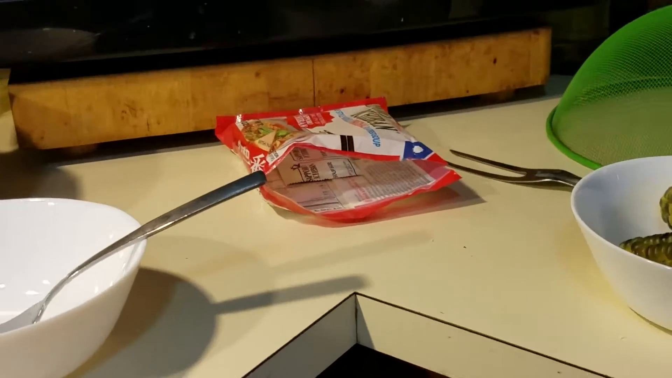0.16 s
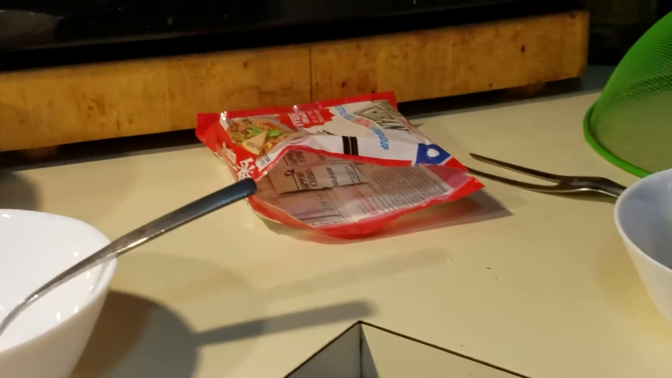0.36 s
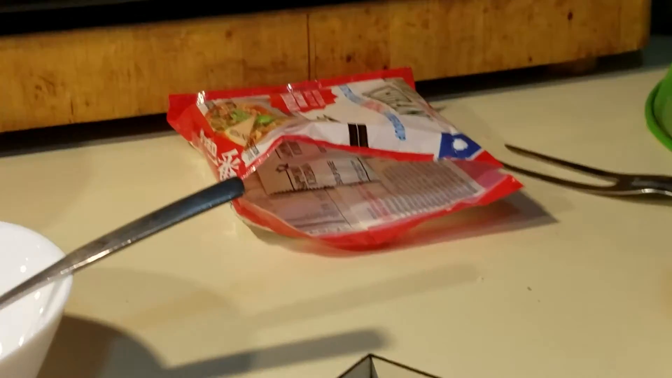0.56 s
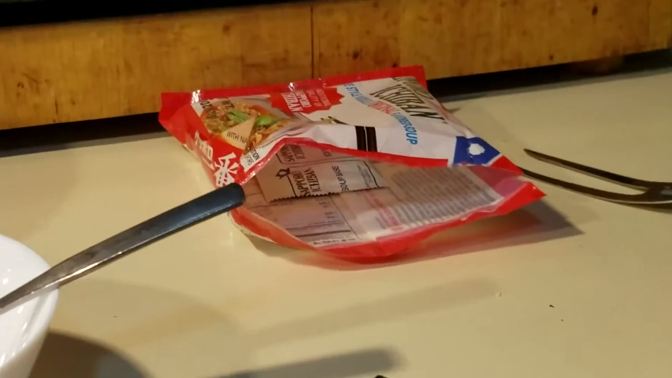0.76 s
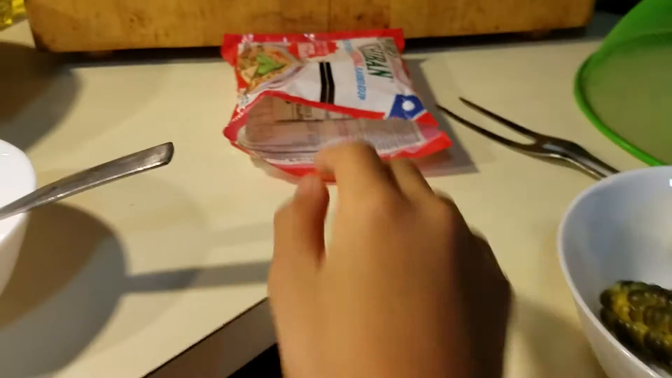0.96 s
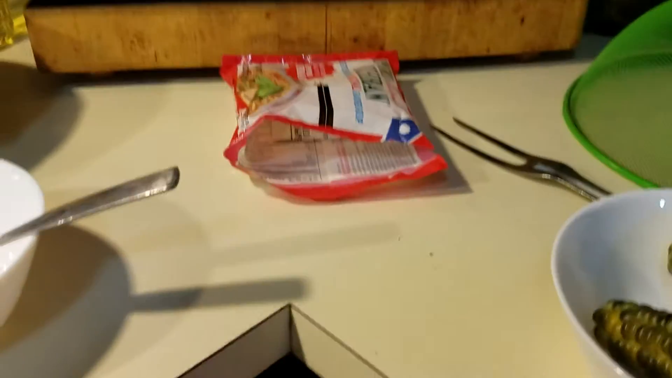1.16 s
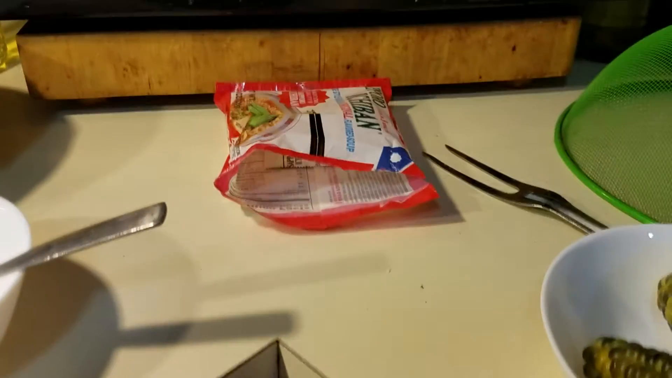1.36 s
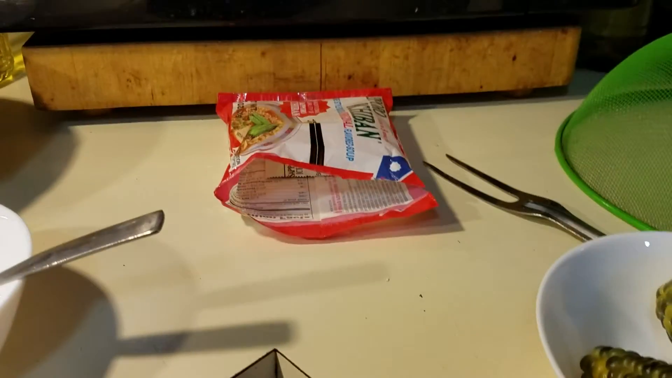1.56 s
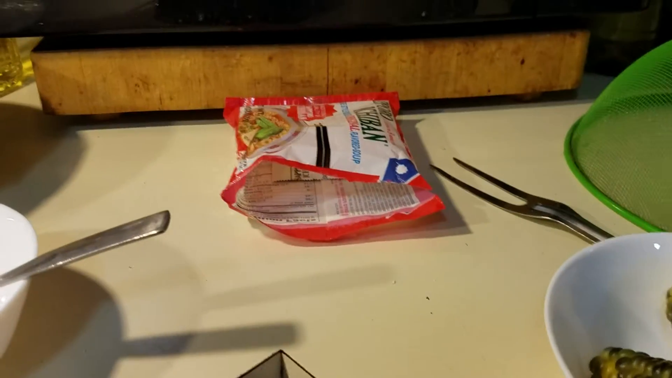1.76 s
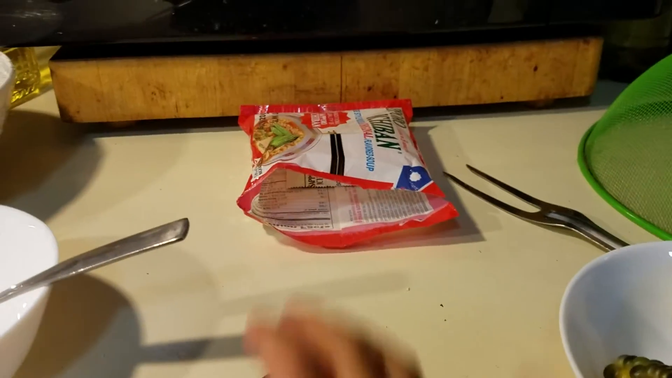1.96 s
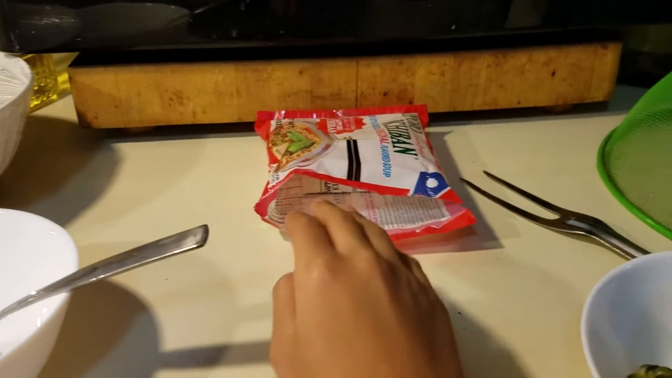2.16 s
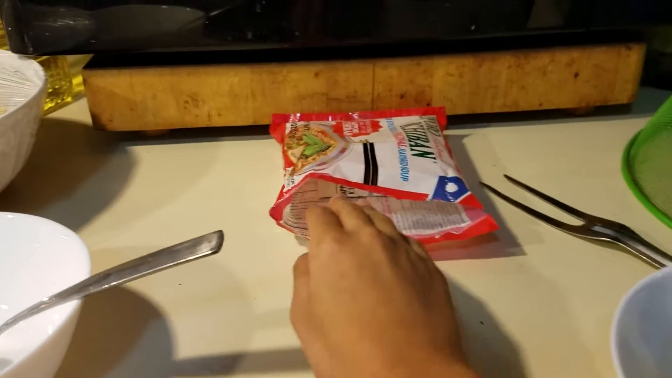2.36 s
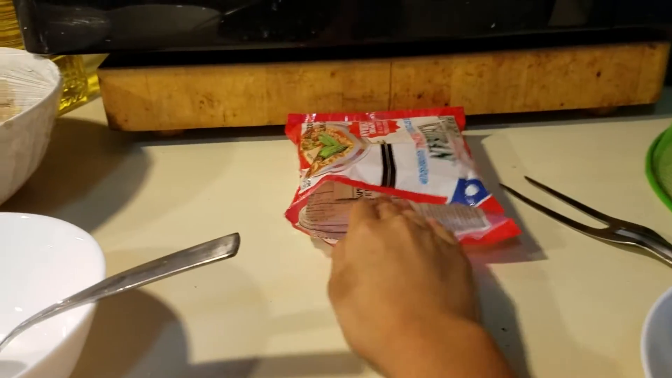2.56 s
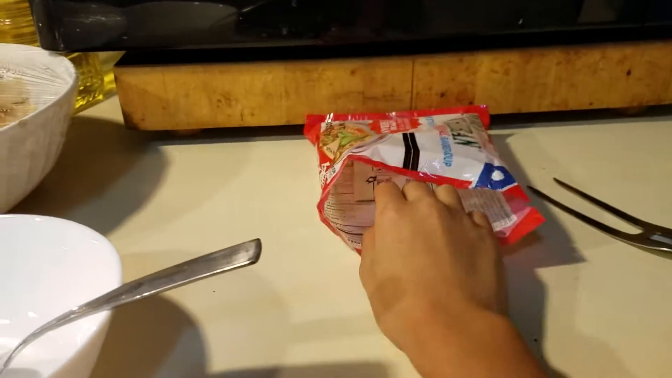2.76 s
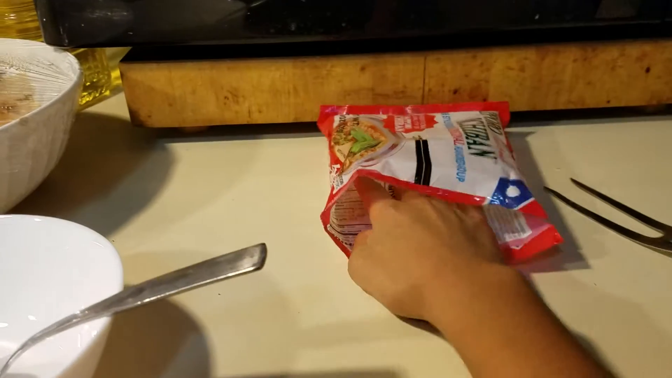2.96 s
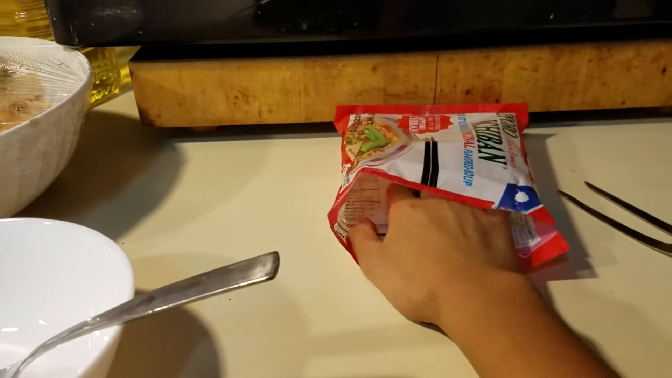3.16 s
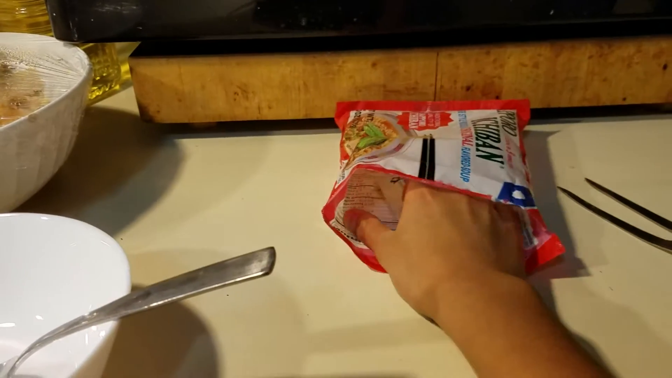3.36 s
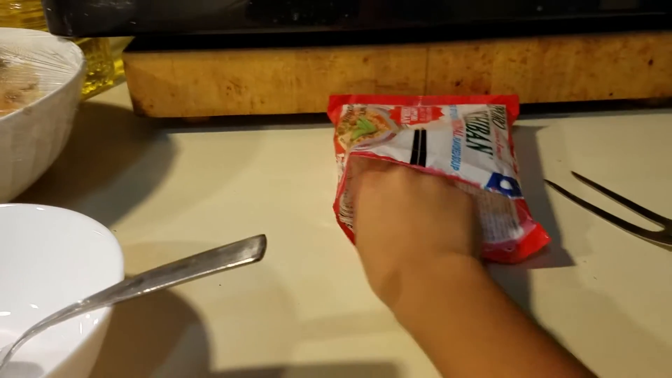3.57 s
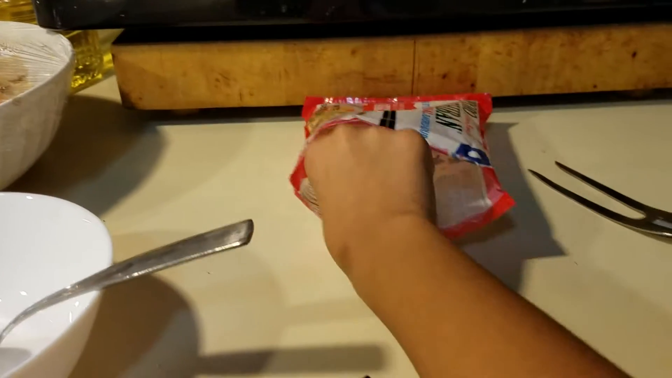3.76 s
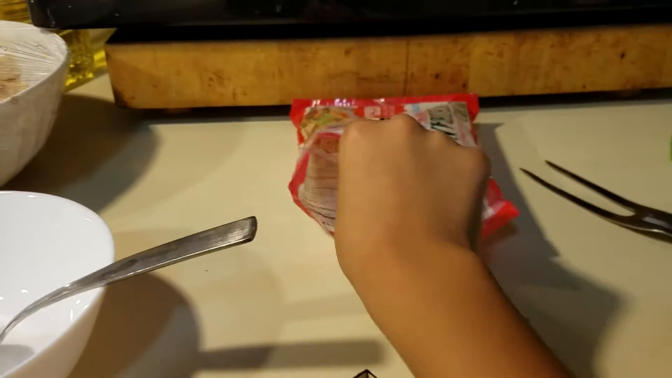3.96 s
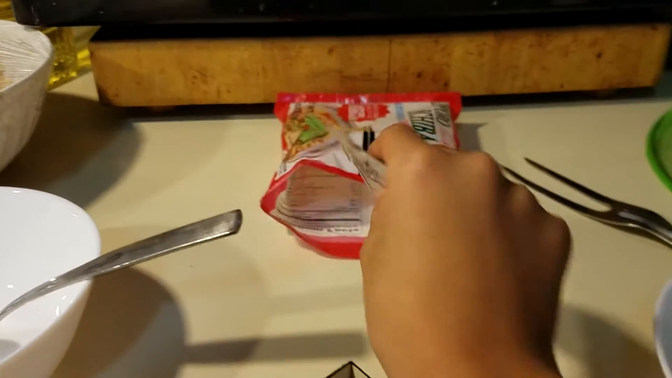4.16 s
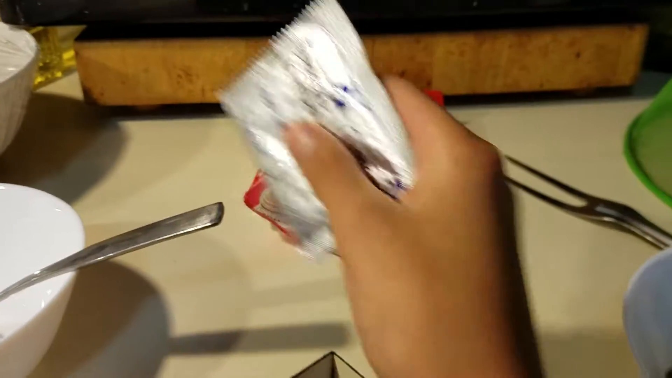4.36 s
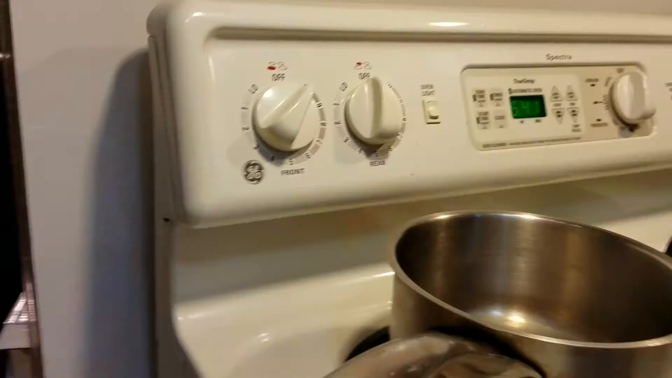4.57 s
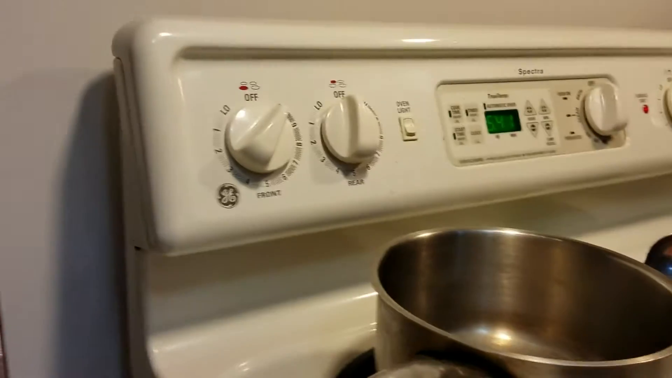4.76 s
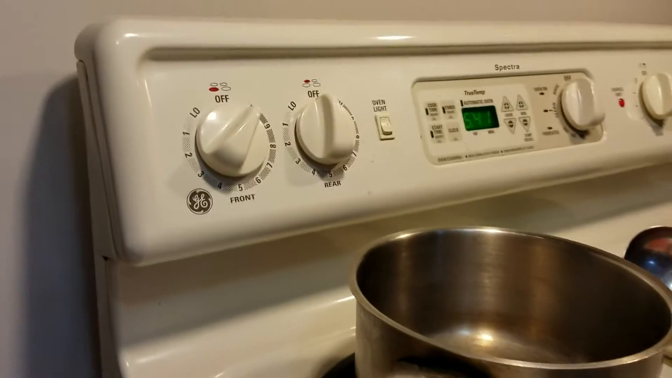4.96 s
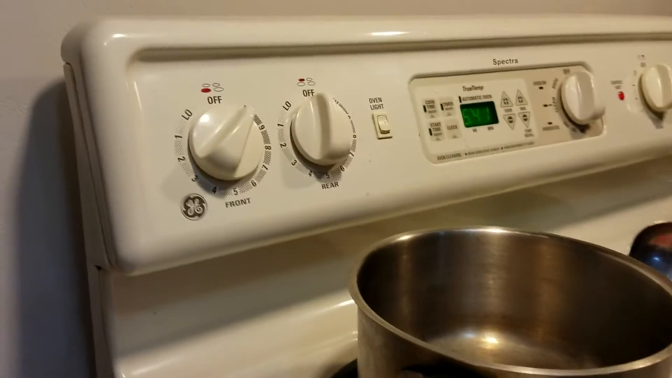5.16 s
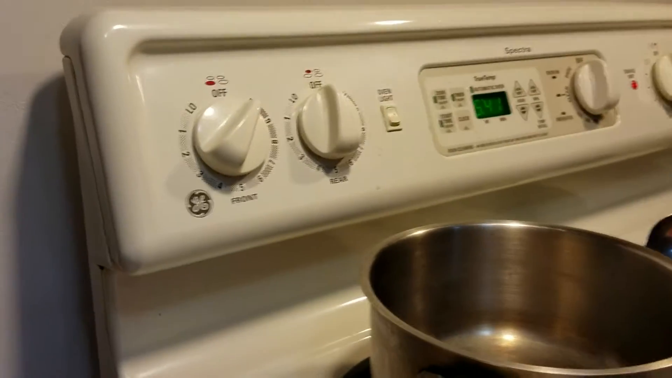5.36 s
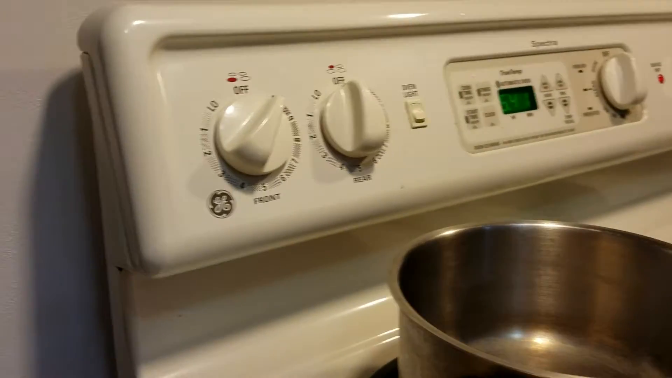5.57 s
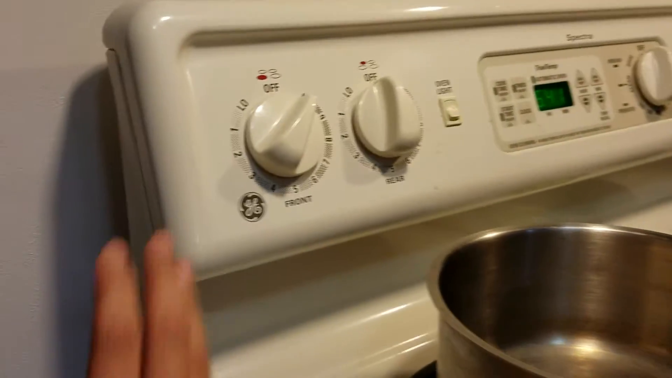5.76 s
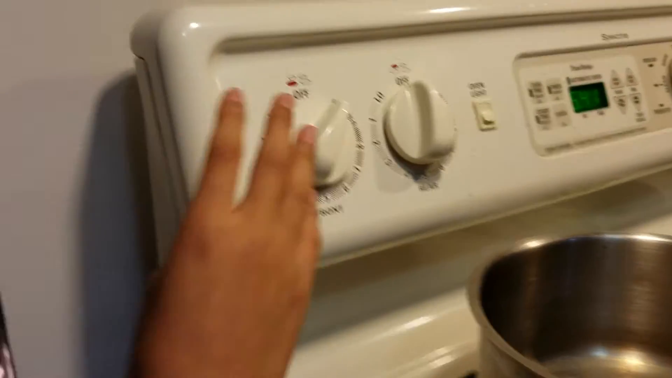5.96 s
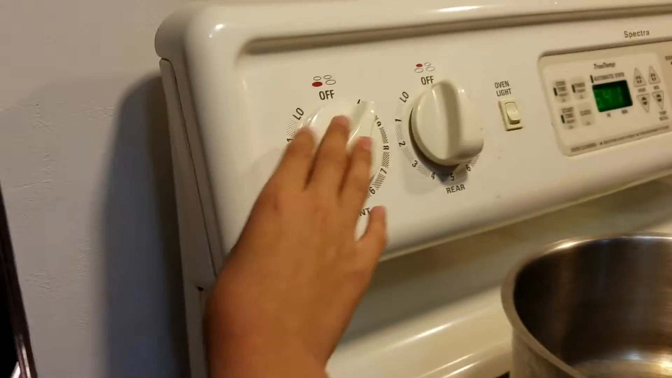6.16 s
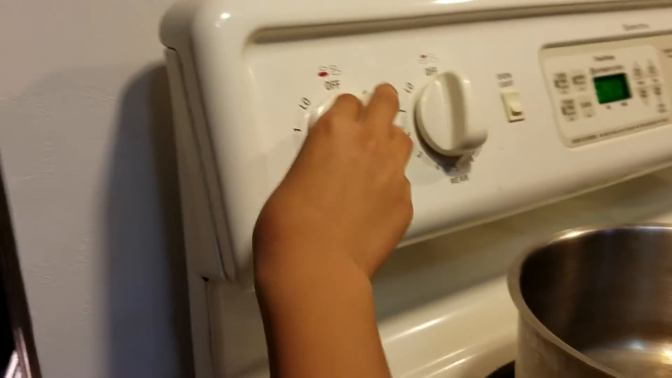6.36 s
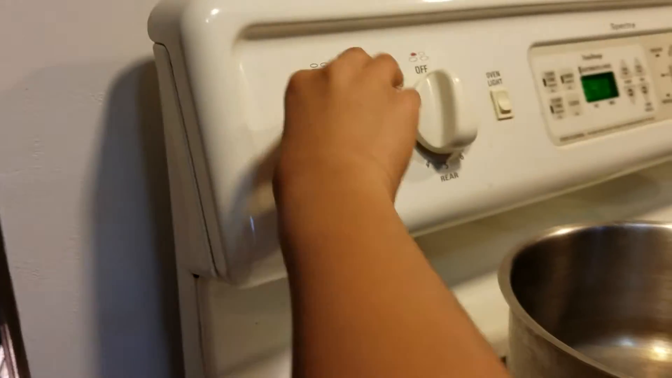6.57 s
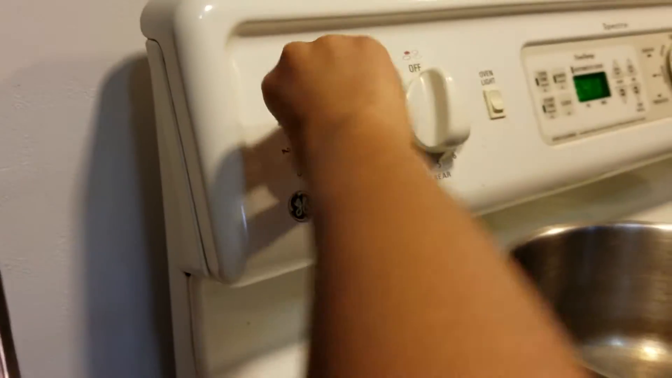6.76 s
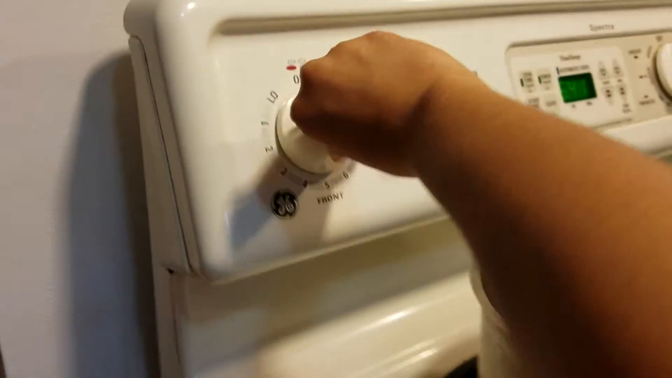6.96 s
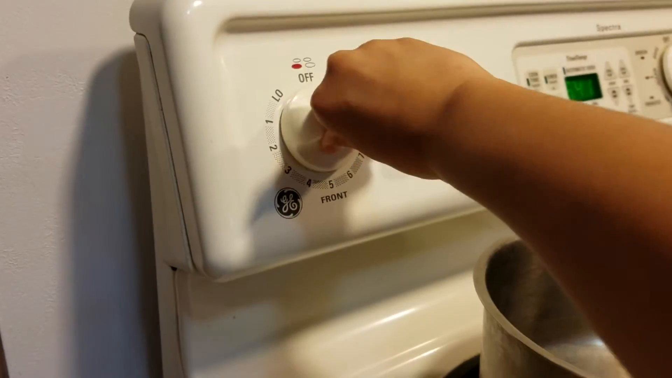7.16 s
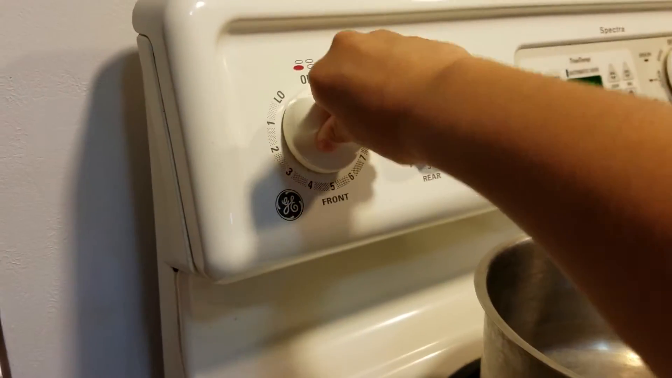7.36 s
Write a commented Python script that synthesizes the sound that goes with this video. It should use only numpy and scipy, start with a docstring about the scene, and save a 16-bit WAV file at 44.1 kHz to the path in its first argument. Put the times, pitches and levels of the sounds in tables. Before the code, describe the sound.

Close to a stereo microphone, after a moment of low kitchen room tone, a plastic wrapper rustles and crackles in uneven squeezes, with the crunch and small hollow knocks of dry noodles inside. A sachet swishes out softly. Then a faint, steady hiss starts slightly to the right, fingers tap and bump, a dry tick sounds, and a stove knob clicks round, briefly ringing its metal panel.

```python
"""Noodle packet and stove knob

A small kitchen, a stereo phone close to the worktop. A hand squeezes an opened packet of dry instant
noodles: creases in the plastic snap over a rustle of tiny buckles and crumbs, the block knocks on the
worktop, and the soup sachet slides out. A faint background hiss sets in on the right. Then the hand
takes hold of a stove knob and turns it with a click that rings its steel panel."""
import sys
import numpy as np
from scipy import signal
from scipy.fft import rfft, irfft, next_fast_len
from scipy.io import wavfile
from scipy.ndimage import uniform_filter1d

SR = 44100
rng = np.random.default_rng(int(sys.argv[2]) if len(sys.argv) > 2 else 0)


def put_to_file(sound):
    """Save the sound as 16-bit audio at rate SR, in the file named by the first command-line argument."""
    columns = np.atleast_2d(sound).T  # one column per channel
    safe = np.clip(columns, -1, 1)
    whole_steps = np.round(safe * 32767)
    wavfile.write(sys.argv[1], SR, whole_steps.astype(np.int16))


N = 326945
TIME = np.arange(N) / SR
TOP_HZ = 15900  # the phone's upper limit
HAND_IN_S, HAND_OUT_S = 2.42, 4.094  # the hand is in the packet

# Snaps of the packet, levels over the first 10 ms, the facet against its own band:
# start_s, noodle_crack_db, film_db, fizz_db, decay_s, ring_hz, facet_db
CREASE_SNAPS = [(2.429, -52.5, -51.5, -74, .004, 3550, 6), (2.4694, -45.5, -54, -57, 0.011, 1290, 3),
                (2.4807, -44, -47.5, -68, 0.013, 1400, -12), (2.5841, -44.5, -36.5, -41.5, 0.0042, 5750, 3),
                (2.658, -59, -50.5, -61, 0.0051, 6300, 3), (2.714, -48.5, -51, -60, 0.0095, 3570, -2),
                (2.7328, -61, -45, -54, 0.0048, 3400, 3), (2.7371, -43.5, -34, -38, 0.0045, 2900, -2),
                (2.7635, -48, -47, -42.5, 0.0093, 8630, 0), (2.8137, -47, -50, -50, 0.0048, 8890, 0),
                (2.866, -50, -48, -36, 0.0084, 4250, -6), (2.869, -47, -38.5, -49, 0.0068, 3420, -13),
                (2.891, -41.5, -42.5, -40, .006, 1380, 4), (2.9343, -49, -50, -45, 0.0066, 12530, 0),
                (2.972, -43.5, -39, -52, 0.0032, 3040, -3), (2.9756, -41.5, -34, -46, 0.0062, 4800, -3),
                (2.9851, -43, -37, -55, 0.0043, 3600, -1), (3.0198, -49, -33.5, -46, 0.0024, 5550, 0),
                (3.058, -46.5, -45, -55, 0.0024, 6960, -2), (3.079, -46, -50, -52, 0.0026, 2520, 8),
                (3.0903, -40.5, -41, -32, 0.0027, 1750, 9), (3.1272, -54, -37, -37, 0.0046, 4950, 9),
                (3.1616, -64, -44, -45, 0.009, 8760, 0), (3.183, -51, -47, -53, 0.0016, 4500, 2.5),
                (3.1933, -47.5, -39, -38, .0034, 5800, 8), (3.2557, -45, -35, -47, 0.0033, 3350, -14),
                (3.3001, -43, -43, -51, 0.0086, 3400, -5), (3.3113, -42, -31, -35.5, 0.0026, 3410, 8),
                (3.3807, -44, -42.5, -48, 0.0085, 2400, -16), (3.3977, -57, -45.5, -43, .004, 3210, -2),
                (3.4555, -44.5, -35.5, -33.5, 0.0016, 3020, -7), (3.4628, -42.5, -42, -49, 0.021, 2900, 7),
                (3.5013, -45.5, -34.5, -33.5, 0.0037, 3070, 8), (3.532, -47, -43, -52, 0.0045, 3540, 6),
                (3.538, -52, -46, -52, .003, 3800, 8), (3.5567, -26, -32, -31.5, 0.0072, 2310, -7),
                (3.6416, -39.5, -49, -55, 0.0025, 1800, -7), (3.6588, -44, -47, -65, .003, 2200, -2),
                (3.726, -47, -62, -62, 0.0061, 1940, -3), (3.7728, -51.5, -46, -63.5, 0.0052, 2900, 11),
                (3.821, -41.5, -56, -57, 0.004, 1800, -11), (3.8232, -46, -46.5, -52, 0.0031, 2660, -3),
                (3.828, -46.5, -55, -56, 0.0033, 1900, -3), (3.904, -50.5, -61, -70, .005, 1720, -1.5),
                (3.923, -51.5, -62, -68, .012, 1350, 8), (3.946, -39.5, -46, -48, 0.0049, 1680, 14),
                (3.96, -57, -55, -62, .004, 1450, 0), (3.9805, -51, -48, -74, 0.003, 3240, 9),
                (3.987, -55, -53, -70, .003, 3800, 5), (4.0125, -55, -56, -62, .003, 3700, 0),
                (4.031, -44, -46.5, -44.5, .0046, 2660, 6)]
# A snap's body, crack, film, upper film and fizz: low_hz, high_hz
SNAP_BANDS = [(270, 680), (950, 2800), (2800, 7500), (7500, 11000), (11000, 17000)]
# Where the wrapper gives way: time_s, left_minus_right_db
SNAP_PAN = [(2.5, 2.5), (2.87, -1), (3.1, 0), (3.25, 0), (3.31, 2.5), (3.46, 1.5), (3.56, 3.5), (3.8, 3),
            (4.03, 3)]
# Squeezes of the hand: start_s, held_s, block_db, wrapper_db
HAND_SQUEEZES = [(2.43, 0.031, -62, -55.5), (2.474, 0.0093, -59, -66), (2.592, 0.018, -50.5, -65),
                 (2.75, 0.021, -47.5, -44.5), (2.82, .03, -59, -54), (2.87, 0.024, -42.5, -47),
                 (2.935, .31, -55.5, -46), (3.365, 0.029, -45.5, -42.5), (3.462, 0.061, -53.5, -42.5),
                 (3.565, 0.068, -41, -38), (3.70, 0.26, -65, -56.5), (3.94, 0.016, -52.5, -53.5)]
# Low body of the rustle: frequency_hz, gain_db
BODY_COLOUR = [(60, -16.5), (130, 0), (190, -2), (310, -1), (540, -0.5), (700, 0.5), (950, -22)]
# Crunch of the noodles: frequency_hz, gain_db
CRUNCH_COLOUR = [(600, -23.5), (860, -9), (1100, 1.5), (1450, 1), (1800, -0.5), (2700, -5), (3600, -11.5)]
# Rustle of the plastic film: frequency_hz, gain_db
FILM_COLOUR = [(1900, -9.5), (3000, 6), (4200, -3), (6500, -5.5), (9000, -4.5), (12500, 1.5), (16000, -16)]
# Air modes inside the bag: pitch_hz, width_hz, gain_db
BAG_AIR_MODES = [(195, 30, -6.5), (310, 27, -14), (520, 11, -13), (1068, 14, -9), (1380, 45, -6),
                 (1805, 25, 2.5), (2230, 20, -17), (2400, 52, 1), (2970, 42, -11)]
# The noodle block knocks on the worktop: start_s, level_db
BLOCK_KNOCKS = [(2.4702, -46), (2.4835, -39.5), (2.5848, -35.5), (3.5575, -45), (3.8218, -36.5),
                (3.9465, -45), (4.0315, -44.5)]
# The block's hollow ring: pitch_hz, gain_db, t60_s
BLOCK_RING = [(1047, -2.5, 0.038), (1110, -7.5, 0.025), (1680, -10, .07), (1810, -8, .06),
              (2900, -6, 0.044)]
# The sachet slides out in two pulls, then shifts in the fingers: start_s, held_s, level_db
SACHET_SLIDES = [(4.19, 0.054, -52), (4.28, .025, -55.5), (4.485, 0.023, -66)]
# The sachet's swish: frequency_hz, gain_db
SWISH_COLOUR = [(300, -3), (1500, -4), (3000, 2), (4500, -4.5), (7000, -1.5), (12000, -4.5), (16000, -3.5)]
# Small pitched ticks, the later ones from the sachet: start_s, level_db, ring_hz, thud_over_ring_db
FACET_PINGS = [(0.938, -50, 3550, -15), (4.4764, -45.5, 3050, 7), (4.4876, -46, 3050, 4),
               (4.5154, -44.5, 3200, -18)]
# Fingernails touch the knob, then the detent slips and seats: start_s, level_db, panel_weight_db
KNOB_CONTACTS = [(6.4051, -36.5, -17), (6.9146, -34, -5.5), (6.9187, -37.5, 7.5), (6.9201, -39, -2),
                 (6.9254, -39, -14), (6.926, -44, 4), (7.343, -65, 0)]
# Modes of the steel panel and, above 2 kHz, the knob: pitch_hz, gain_db, t60_s
KNOB_AND_PANEL_MODES = [(290, -26, 0.2), (432, -30, 0.13), (634, -11, 0.064), (1090, -13, 0.063),
                        (1224, -9, 0.041), (1400, -12, 0.037), (2345, 0.5, 0.018), (2520, -5, 0.019),
                        (2770, -4, 0.017), (3000, -16, .025), (4340, -25, 0.02), (7900, -10, 0.018)]
# Soft bumps of hand and phone: start_s, peak_db, pitch_hz
SOFT_BUMPS = [(1.484, -55, 104), (1.569, -53.5, 170), (2.483, -45, 188), (2.484, -43.5, 348),
              (2.505, -46, 195), (2.738, -45.5, 315), (2.862, -50, 430), (2.887, -43, 574),
              (2.889, -41, 315), (2.913, -46, 278), (2.984, -47.5, 194), (3.055, -51.5, 196),
              (3.113, -47, 520), (5.061, -52.5, 164), (5.064, -51.5, 650), (5.109, -54.5, 114),
              (5.482, -47.5, 240), (6.433, -43.5, 283), (6.908, -44.5, 418)]
# Faint taps of handling: start_s, level_db
GRIP_TAPS = [(5.368, -51), (5.429, -49), (5.747, -48), (5.986, -47.5), (6.222, -48), (6.44, -48),
             (6.587, -50)]
# Dull colour of a tap: frequency_hz, gain_db
GRIP_TAP_COLOUR = [(120, -9), (300, -4), (560, 2), (900, -10), (1270, -3.5), (1800, -10), (2550, -5),
                   (3600, -24), (12000, -32)]
# Lone dry ticks, levels over the first millisecond: start_s, level_db
DRY_TICKS = [(5.8757, -25.5), (6.707, -48)]
# Bright colour of a tick: frequency_hz, gain_db
DRY_TICK_COLOUR = [(300, -20), (1500, -6), (2300, -3), (2900, 4), (5000, -1.5), (6000, 0), (7300, 9),
                   (8800, -1), (11000, 15.5), (13000, -6), (16000, -7)]
# Faint background hiss that sets in suddenly: frequency_hz, gain_db
HISS_COLOUR = [(30, -23), (87, -0.5), (200, 0.5), (380, -2), (600, 0), (900, -11.5), (1300, -4), (1900, -8),
               (2600, -2.5), (3050, -6.5), (3550, -15), (4900, -14.5), (6100, -17), (7800, -12),
               (9400, -15), (10800, -7), (16000, -10)]
# Lift of the hiss above 4 kHz: time_s, left_db, right_db
HISS_TREBLE_LIFT = [(5.22, 6, 0), (5.65, 4.5, 2.5), (5.95, 5, 3.5), (6.38, 6, 3), (6.56, -1, 1.5),
                    (6.9, 1, 3.5), (7.1, 2, -2), (7.41, 0.5, -5)]
# Room tone of the kitchen: frequency_hz, gain_db
ROOM_TONE_COLOUR = [(25, -24), (59, -10.5), (90, -7.5), (145, -3.5), (215, -7.5), (295, -6), (437, -9.5),
                    (632, -9.5), (850, -11.5), (1100, -11.5), (1400, -10.5), (1900, -9), (2800, -12),
                    (3900, -19.5), (6000, -21), (16000, -19)]
# Slow drift of the room tone: time_s, gain_db
ROOM_TONE_DRIFT = [(0, 2), (1.5, 1.1), (1.7, -0.1), (5.2, 0), (7.41, 0.4)]
# Narrow drones in the background: start_s, end_s, pitch_hz, width_hz, level_db
FAINT_DRONES = [(-0.07, 0.427, 2620, 330, -65), (1.54, 2.112, 149, 39, -66), (4.72, 4.9, 1830, 260, -64),
                (5.197, 5.52, 2900, 360, -64.5), (5.987, 6.952, 2590, 520, -65)]
# Steady appliance hum: pitch_hz, width_hz, level_db
APPLIANCE_HUM = [(633, 63, -73), (1102, 60, -74.5)]
# How alike the two microphones hear a sound: frequency_hz, coherence (0 to 1)
MIC_COHERENCE = [(60, 0.73), (200, 0.94), (500, 0.89), (1000, 0.39), (2500, 0.27), (8000, 0.13),
                 (16000, 0.51)]
# Left microphone port: frequency_hz, gain_db
LEFT_PORT_COLOUR = [(100, 0), (650, 3), (1100, 0.5), (2300, 1), (3200, 3), (4200, 2), (6300, -0.5),
                    (7700, -5), (9000, 3), (11200, -0.5), (15000, -1)]
# Right microphone port: frequency_hz, gain_db
RIGHT_PORT_COLOUR = [(100, -1.5), (650, 1), (1200, 2.5), (2300, -2), (3200, -1), (4800, 3), (6000, -1.5),
                     (8100, 2), (9400, -1.5), (11200, -3), (15000, 1)]


def snaps(click_s=0.00037, click_db=1, rise_s=0.00018, ring_db=-6.5, facet_width=0.22):
    """A crease flips with a sharp click; its facet rings briefly and the sheet around it flutters on."""
    out, t = np.zeros((2, N)), TIME[:4096]
    click = undb(click_db) * np.exp(-t / click_s)
    for start_s, crack_db, film_db, fizz_db, decay_s, ring_hz, facet_db in CREASE_SNAPS:
        body_db = crack_db - 16.5 - 4 * np.log2(ring_hz / 3000)  # smaller facet: higher ring, less body
        levels_db = (body_db, crack_db, film_db, (film_db + fizz_db) / 2, fizz_db)
        pan_db = np.interp(start_s, *np.transpose(SNAP_PAN))
        noise = stereo_noise(len(t), lag_s=0.000157) * (1 - np.exp(-t / rise_s))
        for k, (low_hz, high_hz) in enumerate(SNAP_BANDS):
            flutter_s = decay_s * (0.55 if k == 0 else 1)  # the body dies sooner
            part = band(noise * (click + np.exp(-t / flutter_s)), low_hz, high_hz, order=3)
            if low_hz < ring_hz <= high_hz:
                facet = band_around(part, ring_hz, ring_hz * facet_width, order=1)
                facet = unit(facet) + undb(ring_db) * unit(facet_ring(ring_hz))
                part = unit(part) + undb(facet_db) * unit(facet)
            part /= np.sqrt(np.mean(part[:, :SR // 100] ** 2))
            add(out, start_s, part * undb(levels_db[k]) * pan(pan_db))
    return out


def facet_ring(hz, decay_cycles=26, split=0.058):
    """A flipped facet rings on in two close modes, the upper one weaker."""
    t = TIME[:4096]
    phases = 2 * np.pi * rng.random((2, 2, 1))
    lower = np.sin(2 * np.pi * hz * t + phases[0])
    upper = np.sin(2 * np.pi * hz * (1 + split) * t + phases[1])
    return (lower + 0.5 * upper) * np.exp(-t * hz / decay_cycles)


def rustle(body_db=-7, handling_db=-62, crinkle_share=0.25, pan_db=-0.5):
    """Fingers grind the noodles and buckle the film: swarms of small cracks that follow the squeeze."""
    block, wrapper = squeezes()
    hand_inside = envelope(HAND_IN_S, HAND_OUT_S - HAND_IN_S, attack_s=0.029, release_s=0.35)
    body = np.hypot(undb(body_db) * block, undb(handling_db) * hand_inside)
    crumbs = buckles(per_s=860, spread_db=4.0, decay_s=0.0026, rub=0.2)
    creases = buckles(per_s=500, spread_db=4.4, decay_s=0.0024, rub=0.3)
    out = crinkles() * wrapper * np.sqrt(crinkle_share)
    film = wrapper * np.sqrt(1 - crinkle_share)  # the rest of the wrapper's power
    layers = (BODY_COLOUR, crumbs, body), (CRUNCH_COLOUR, crumbs, block), (FILM_COLOUR, creases, film)
    for shape, grains, gain in layers:
        out += unit(colour(stereo_noise(N, lag_s=0.00013) * grains, shape)) * gain
    return out * pan(pan_db)


def squeezes(resting_block_db=-57, resting_wrapper_db=-67.5):
    """Gains of block and wrapper under the hand: its resting weight and its squeezes add in power."""
    resting = (HAND_IN_S, HAND_OUT_S - HAND_IN_S, resting_block_db, resting_wrapper_db)
    block_power, wrapper_power = 0, 0
    for start_s, held_s, block_db, wrapper_db in [resting, *HAND_SQUEEZES]:
        force = envelope(start_s, held_s, attack_s=0.029, release_s=0.04)
        block_power += (force * undb(block_db)) ** 2
        wrapper_power += (force * undb(wrapper_db)) ** 2
    return np.sqrt(block_power), np.sqrt(wrapper_power)


def buckles(per_s, spread_db, decay_s, rub):
    """Envelope of many tiny buckles, mostly small and a few large, over steady rubbing."""
    sizes = undb(spread_db * np.minimum(rng.exponential(size=N), 4))
    impulses = (rng.random(N) < per_s / SR) * sizes ** 2
    energy = signal.lfilter([1], [1, -np.exp(-2 / (decay_s * SR))], impulses)
    return np.sqrt(energy / energy.mean() + rub)


def crinkles(count=450, low_hz=2200, high_hz=13000, decay_cycles=0.9, width_db=3):
    """Little creases of the film: clicks of a cycle or two, each with its own pitch, size and place."""
    out, t = np.zeros((2, N)), TIME[:256]
    span_s = HAND_OUT_S - HAND_IN_S
    for when, pitch, size, place, phase in rng.random((count, 5)):
        hz = low_hz * (high_hz / low_hz) ** pitch
        offset_cycles = np.array([[phase / 2], [0]])
        click = np.sin(2 * np.pi * (hz * t + offset_cycles)) * np.exp(-t * hz / decay_cycles)
        size_db = min(-np.log(1 - size), 3)
        add(out, HAND_IN_S + when * span_s, undb(size_db) * unit(click) * pan(width_db * (2 * place - 1)))
    return unit(out) * np.sqrt(span_s * SR / N)  # rms 1 while the hand is inside


def bag(cracks, direct_db=-1):
    """Every crack also rings the air inside the bag."""
    air = sum(undb(db) * band_around(cracks, hz, width_hz, order=1) for hz, width_hz, db in BAG_AIR_MODES)
    return undb(direct_db) * cracks + air


def knocks(rise_s=0.00028, detune_spread=0.008, phase_spread_rad=0.93, pan_db=-3):
    """The dry block tips against the worktop and rings hollow, a little differently each time."""
    out, t = np.zeros((2, N)), TIME[:4096]
    rise = 1 - np.exp(-t / rise_s)
    for start_s, level_db in BLOCK_KNOCKS:
        for hz, mode_db, t60_s in BLOCK_RING:
            detuned_hz = hz * (1 + detune_spread * rng.standard_normal())
            phases = phase_spread_rad * rng.standard_normal((2, 1))
            ring = np.sin(2 * np.pi * detuned_hz * t + phases) * decay(t, t60_s)
            add(out, start_s, undb(level_db + mode_db) * ring * rise)
    return out * pan(pan_db)


def sachet(flicker_db=1.5, attack_s=0.063, release_s=0.051, pan_db=2):
    """The soup sachet slides out over the wrapper with a soft, even swish."""
    power = sum((undb(level_db) * envelope(start_s, held_s, attack_s, release_s)) ** 2
                for start_s, held_s, level_db in SACHET_SLIDES)
    swish = unit(colour(stereo_noise(N), SWISH_COLOUR))
    return swish * np.sqrt(power) * undb(flicker_db * wander(200)) * pan(pan_db)


def pings(ring_s=0.0014, thud_hz=1550, thud_s=0.00074, rise_s=0.00023):
    """A small stiff facet pops over and rings for a few cycles; the sheet behind gives a lower thud."""
    out, t = np.zeros((2, N)), TIME[:1024]
    rise = 1 - np.exp(-t / rise_s)
    for start_s, level_db, ring_hz, thud_db in FACET_PINGS:
        ring = np.sin(2 * np.pi * ring_hz * t) * np.exp(-t / ring_s)
        thud = undb(thud_db) * np.sin(2 * np.pi * thud_hz * t) * np.exp(-t / thud_s)
        add(out, start_s, undb(level_db) * (ring + thud) * rise * pan(0))
    return out


def knob(scrape_db=-7, scrape_per_weight=0.79, scrape_s=0.0074, rattle_db=-19, rattle_s=0.033):
    """Each contact rings the knob and the panel behind it, with a short plastic scrape and a rattle."""
    out, t = np.zeros((2, N)), TIME[:8192]
    for start_s, level_db, panel_db in KNOB_CONTACTS:
        scrape = unit(band(stereo_noise(len(t)), 6100, 13000, order=1)) * np.exp(-t / scrape_s)
        rattle = unit(band(stereo_noise(len(t)), 240, 1600)) * np.exp(-t / rattle_s)
        contact = undb(scrape_db + scrape_per_weight * panel_db) * scrape
        contact += undb(rattle_db + panel_db) * rattle
        for hz, mode_db, t60_s in KNOB_AND_PANEL_MODES:
            # higher modes reach the two microphones further out of step
            phases = rng.standard_normal((2, 1)) * min(hz / 1500, 1.5)
            weight_db = panel_db if hz < 2000 else 0
            contact += undb(mode_db + weight_db) * np.sin(2 * np.pi * hz * t + phases) * decay(t, t60_s)
        add(out, start_s, undb(level_db) * contact)
    return out


def shaft(start_s=6.985, level_db=-55.5):
    """The knob's shaft rubs faintly as it turns."""
    grains = buckles(per_s=710, spread_db=6.5, decay_s=0.004, rub=1.5)
    rub = unit(band(stereo_noise(N) * grains, 240, 3000))
    return undb(level_db) * rub * envelope(start_s, held_s=0.059, attack_s=0.014, release_s=0.11)


def bumps(rise_s=0.0014, decay_cycles=2.1):
    """Handling noise: soft flesh pushes slowly, so only one low resonance answers."""
    out, t = np.zeros((2, N)), TIME[:8192]
    for start_s, peak_db, hz in SOFT_BUMPS:
        shape = (1 - np.exp(-t / rise_s)) ** 2 * np.exp(-t * hz / decay_cycles)
        add(out, start_s, undb(peak_db) * shape / shape.max() * np.sin(2 * np.pi * hz * t) * pan(0))
    return out


def taps(decay_s=0.0062):
    """Fingers shift their grip: short, dull taps without a ring."""
    out, t = np.zeros((2, N)), TIME[:2048]
    for start_s, level_db in GRIP_TAPS:
        tap = unit(colour(stereo_noise(len(t)), GRIP_TAP_COLOUR)) * np.exp(-t / decay_s)
        add(out, start_s, undb(level_db) * tap)
    return out


def ticks(smear_s=0.00037, lag_s=0.00004, size=1024):
    """Lone dry ticks: each a sharp impulse whose treble arrives a little after its bass."""
    out = np.zeros((2, N))
    hz = np.arange(size // 2 + 1) * SR / size
    phase_delay_s = smear_s * hz / TOP_HZ + np.array([[lag_s], [0]])
    tick = colour(irfft(np.exp(-2j * np.pi * hz * phase_delay_s)), DRY_TICK_COLOUR)
    tick /= np.sqrt(np.mean(tick[:, :SR // 1000] ** 2))
    for start_s, level_db in DRY_TICKS:
        add(out, start_s, undb(level_db) * tick)
    return out


def hiss(start_s=5.213, base_db=-52, sag_db_per_s=0.8, burst_db=2.5, burst_s=0.038, pan_db=-3.5):
    """A soft, grainy hiss on the right: it overshoots at the start, sinks slowly and dulls at the end."""
    age_s = np.maximum(TIME - start_s, 0)
    air = unit(colour(stereo_noise(N, lag_s=0.000366), HISS_COLOUR))
    treble = signal.sosfiltfilt(signal.butter(4, 4000, "high", fs=SR, output="sos"), air)
    treble_db = curves(HISS_TREBLE_LIFT) + 1.5 * wander(150)  # the treble flickers
    level_db = base_db - sag_db_per_s * age_s + burst_db * np.exp(-age_s / burst_s)
    level_db += 0.8 * wander(15)  # the level wavers
    onset = np.minimum(age_s / 0.003, 1)
    return (air - treble + treble * undb(treble_db)) * onset * undb(level_db) * pan(pan_db)


def room_tone(base_db=-58.5, waver_db=0.5, flicker_db=3.5, fade_s=0.029, lag_s=-0.000354, pan_db=0.5):
    """Quiet kitchen air, a little to the left, with appliance hum and narrow drones that come and go."""
    air = unit(colour(stereo_noise(N, lag_s), ROOM_TONE_COLOUR))
    out = air * undb(base_db + curves(ROOM_TONE_DRIFT) + waver_db * wander(12))
    for start_s, end_s, hz, width_hz, level_db in FAINT_DRONES:
        fade = np.clip(np.minimum(TIME - start_s, end_s - TIME) / fade_s, 0, 1)
        drone = unit(band_around(stereo_noise(N, lag_s), hz, width_hz))
        out += drone * fade * undb(level_db + flicker_db * wander(70))
    for hz, width_hz, level_db in APPLIANCE_HUM:
        out += undb(level_db) * unit(band_around(stereo_noise(N, lag_s), hz, width_hz))
    return out * pan(pan_db)


def room(direct, wet_db=-13, t60_s=0.21, gap_s=0.004, dull_hz=6000):
    """Worktop, walls and cupboards return a short, duller wash."""
    t = TIME[:SR // 2]
    tail = band(stereo_noise(len(t)), 140, dull_hz, order=1) * decay(t, t60_s) * (t > gap_s)
    tail /= np.sqrt(np.sum(tail ** 2) / 2)
    return direct + undb(wet_db) * signal.fftconvolve(direct, tail, axes=1)[:, :N]


def stereo_noise(size, lag_s=0):
    """White noise at two microphones; the part that they share reaches the left one lag_s later."""
    fft_size = next_fast_len(size // 2 + 1) * 2
    coherence = on_log_axis(MIC_COHERENCE, fft_size)
    right, unshared = rfft(rng.standard_normal((2, fft_size)))
    delay = np.exp(-2j * np.pi * np.arange(len(right)) * SR / fft_size * lag_s)
    left = coherence * delay * right + np.sqrt(1 - coherence ** 2) * unshared
    return irfft(np.array([left, right]))[:, :size]


def colour(x, points, size=4096):
    """Minimum-phase filter with the given (frequency_hz, gain_db) shape."""
    cepstrum = irfft(np.log(undb(on_log_axis(points, size))))
    cepstrum[1:size // 2] *= 2
    cepstrum[size // 2 + 1:] = 0
    response = irfft(np.exp(rfft(cepstrum)))
    return signal.fftconvolve(x, response[None])[:, :x.shape[1]]


def on_log_axis(points, size):
    """Read (frequency_hz, value) points at the bins of a transform."""
    hz, value = np.transpose(points)
    return np.interp(np.log(np.arange(size // 2 + 1) * SR / size + 1), np.log(hz), value)


def band(x, low_hz, high_hz, order=2):
    """Causal band-pass between two edges."""
    return signal.sosfilt(signal.butter(order, [low_hz, high_hz], "band", fs=SR, output="sos"), x)


def band_around(x, hz, width_hz, order=2):
    """Causal band-pass around a centre."""
    return band(x, hz - width_hz / 2, hz + width_hz / 2, order)


def envelope(start_s, held_s, attack_s, release_s):
    """Rises to 1 by start_s, holds, then dies away."""
    rise = np.clip(1 + (TIME - start_s) / attack_s, 0, 1)
    return rise * np.exp(-np.maximum(TIME - start_s - held_s, 0) / release_s)


def decay(t, t60_s):
    """Falls by 60 dB in t60_s."""
    return np.exp(-np.log(1000) * t / t60_s)


def wander(rate_hz):
    """Random levels, each held 1 / rate_hz seconds, smoothed twice and scaled to rms 1."""
    hold = int(SR / rate_hz)
    steps = np.repeat(rng.standard_normal(N // hold + 1), hold)
    return unit(uniform_filter1d(uniform_filter1d(steps, hold), hold)[:N])


def curves(table):
    """The columns of a table, joined by straight lines in time."""
    time_s, *columns = np.transpose(table)
    return np.array([np.interp(TIME, time_s, column) for column in columns])


def undb(db):
    """Decibels to gain."""
    return 10 ** (np.asarray(db) / 20)


def unit(x):
    """Scale to rms 1."""
    return x / np.sqrt(np.mean(x ** 2) + 1e-30)


def pan(db):
    """Channel gains that put the left db above the right."""
    return undb(np.array([[db], [-db]]) / 2)


def add(out, start_s, sound):
    """Mix a sound in at start_s."""
    i = int(start_s * SR)
    out[:, i:i + sound.shape[1]] += sound[:, :N - i]


def scene():
    """Packet, knob and handling sound in the room; sachet, ticks, pings, hiss and room tone stay dry."""
    close = bag(snaps() + rustle()) + knocks() + knob() + shaft() + bumps() + taps()
    return room(close) + sachet() + ticks() + pings() + room_tone() + hiss()


def record(dry):
    """Each microphone port adds its own colour; the phone cuts the top."""
    heard = np.vstack([colour(dry[:1], LEFT_PORT_COLOUR), colour(dry[1:], RIGHT_PORT_COLOUR)])
    return signal.sosfilt(signal.ellip(10, 0.2, 70, TOP_HZ, fs=SR, output="sos"), heard)


dry = scene()
out = record(dry)
put_to_file(out)
```